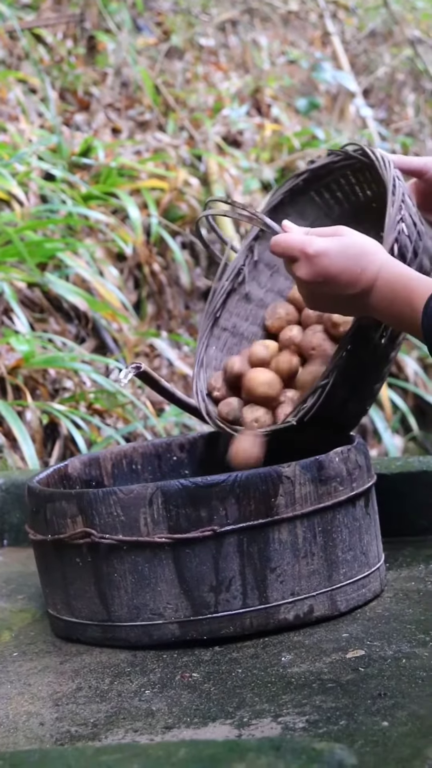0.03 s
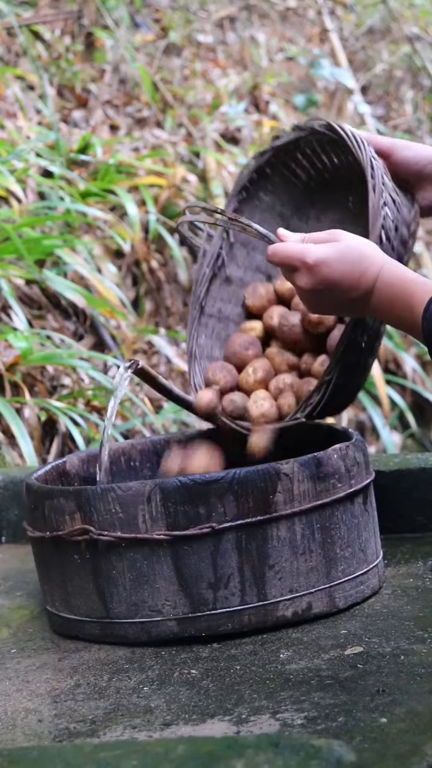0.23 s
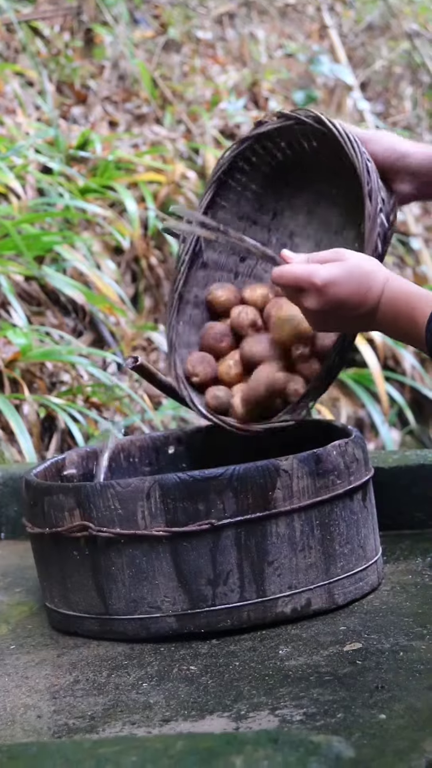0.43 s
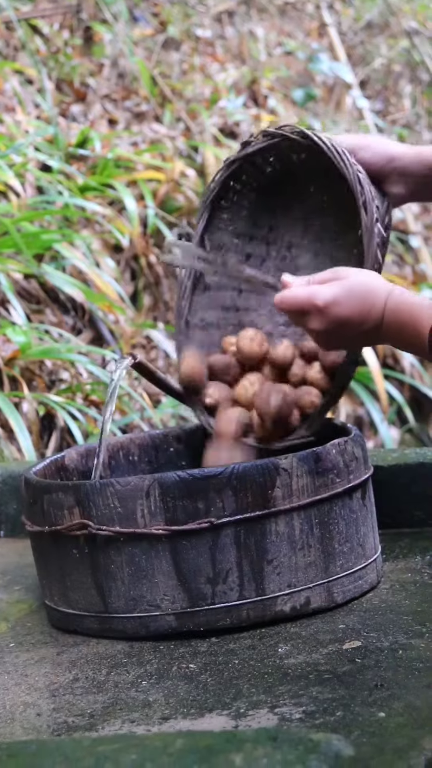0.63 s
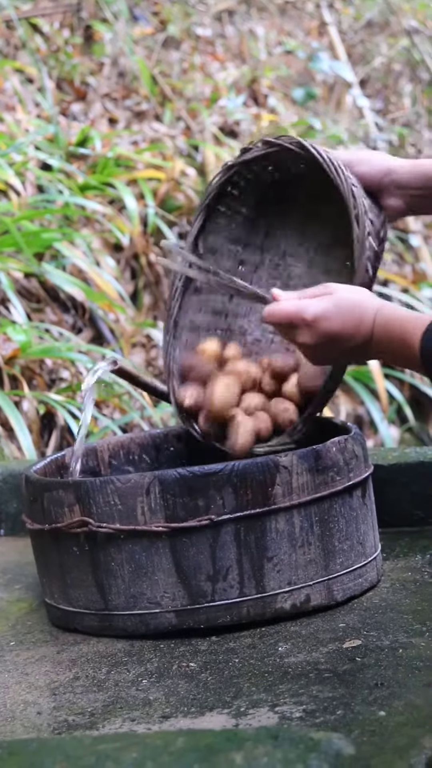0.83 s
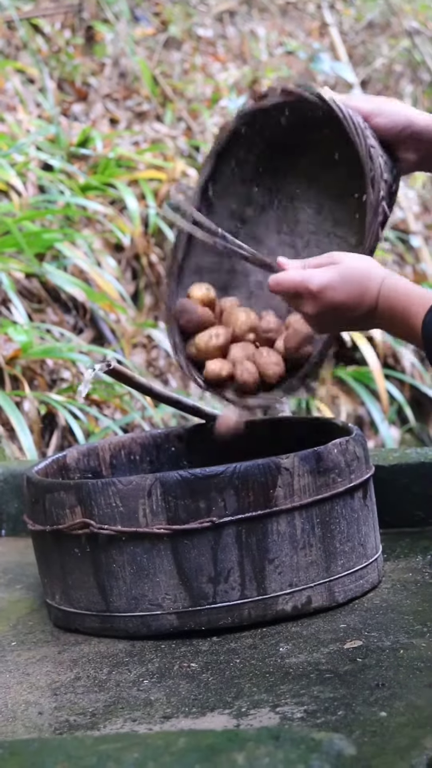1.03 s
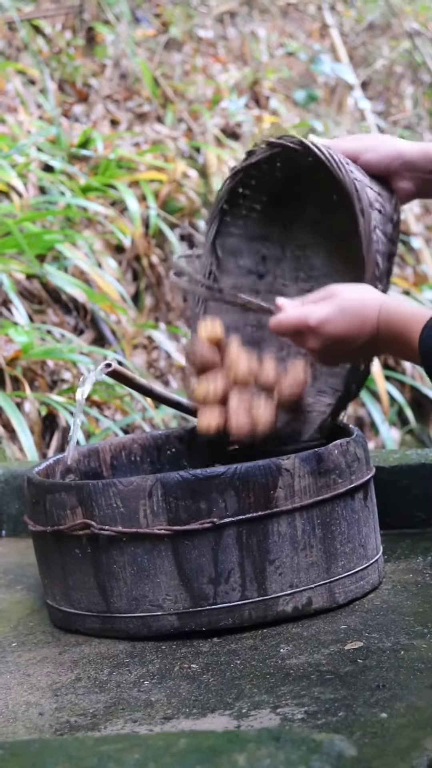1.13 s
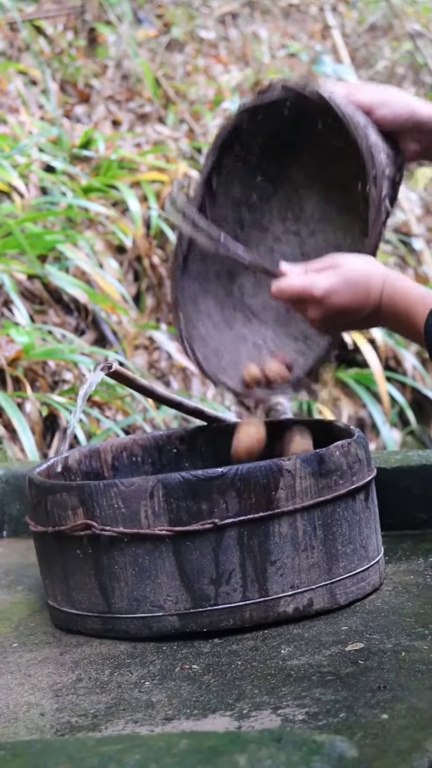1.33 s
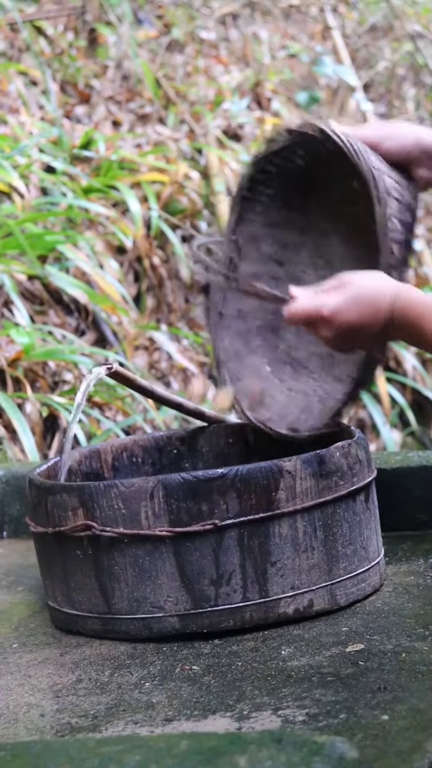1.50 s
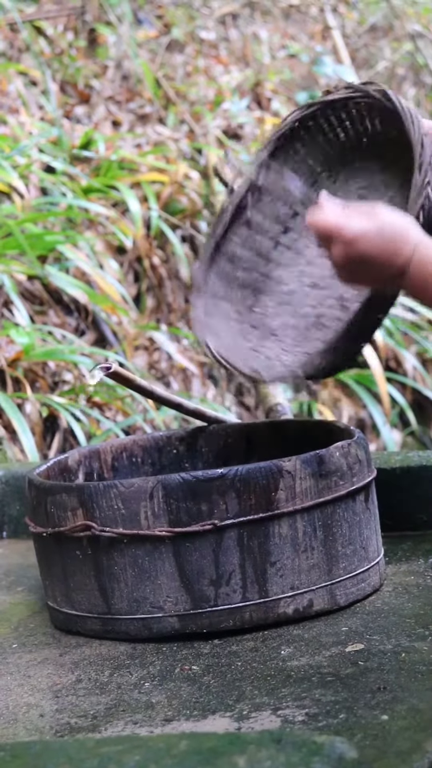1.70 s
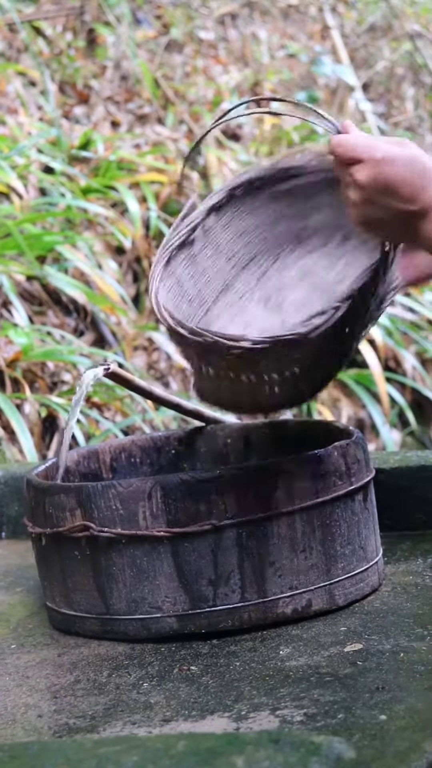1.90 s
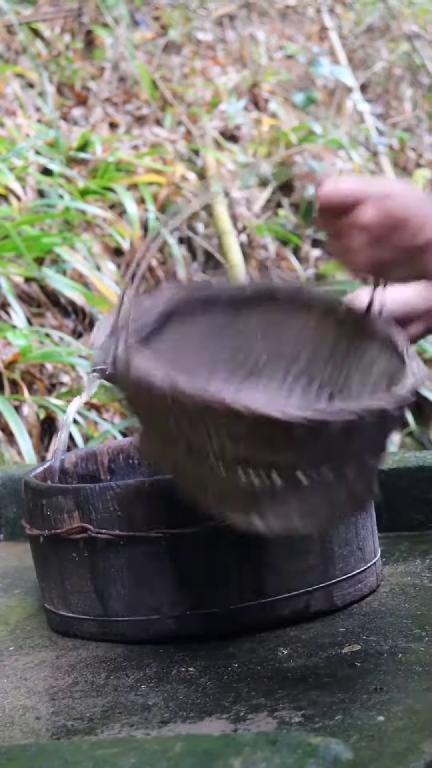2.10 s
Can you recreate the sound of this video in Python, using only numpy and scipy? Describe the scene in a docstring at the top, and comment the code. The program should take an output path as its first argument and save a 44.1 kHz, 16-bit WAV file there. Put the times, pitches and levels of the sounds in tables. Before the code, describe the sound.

Small potatoes tumble into a wet wooden tub with hollow thuds and little splashes.

```python
"""Outdoors, at a wet wooden tub: small potatoes are tipped in from a wicker basket.
Each thuds on the boards, rings the tub's hollow and jostles the others; some slap into shallow
water and throw drops that ring as bubbles. The wicker crackles and snaps as the load rolls out.
A thin stream trickles into the tub, over faint air hiss and yard reflections."""
import sys
import numpy as np
from scipy import signal
from scipy.fft import rfft, irfft
from scipy.io import wavfile
from scipy.ndimage import uniform_filter1d

SR = 44100
rng = np.random.default_rng(int(sys.argv[2]) if len(sys.argv) > 2 else 0)


def master(y):
    """Save y as 16-bit WAV."""
    cut = np.clip(np.atleast_2d(y).T, -1, 1)
    pcm = np.round(cut * 32767)  # scale
    wavfile.write(sys.argv[1], SR, pcm.astype(np.int16))


N = 94815
TIME_S = np.arange(N) / SR

# Table levels are relative; each source adds its own gain.
# (time [s], hollow ring [dB], board knock [dB], base thump [dB], favoured ring [Hz], favoured knock [Hz])
LANDINGS = [(.189,-27.5,-36.5,-32,392,1210), (.201,-13.5,-26,-40,380,740), (.341,-10.5,-17.5,-52,460,804),
            (.353,-16.5,-28,-33,420,1190), (.383,-11.5,-18.5,-50,404,1160), (.390,-27,-23,-27,420,1150),
            (.413,-15,-27.5,-52,470,885), (.486,-23.5,-25.5,-30,360,1290), (.584,-25,-60,-44,384,1110),
            (.666,-7.5,-15,-36,400,1030), (.677,-12.5,-38,-30,400,1400), (.711,-9.5,-26.5,-30,400,1230),
            (.764,-12,-23,-30,397,1140), (.774,-13.5,-27.5,-29,377,1170), (.816,-13,-21.5,-22.5,360,1110),
            (.858,-12.5,-20.5,-39,390,1160), (.877,-15.5,-21.5,-24,304,1330),
            (0.955,-55,-35.5,-32.5,315,1136), (.992,-15.5,-25.5,-54,444,1140), (1.032,-18,-25,-47,400,966),
            (1.057,-17.5,-47,-62,394,1400), (1.078,-21,-19.5,-66,405,1260), (1.096,-14.5,-32,-67,366,1120),
            (1.207,-18,-17.5,-24,386,770), (1.241,-26,-30,-28,400,850), (1.283,-14,-24.5,-33,440,810),
            (1.319,-10.5,-13.5,-53,480,1260), (1.350,-16.5,-25.5,-56,427,1270),
            (1.402,-14,-22.5,-26.5,347,1020), (1.468,-20,-27,-39,460,1200), (1.506,-21,-28.5,-48,470,1360),
            (1.529,-22,-48,-36,466,1200), (1.581,-24,-26,-26,307,1090), (1.684,-20,-30,-32.5,312,730),
            (1.812,-35.5,-47,-52,450,910)]
HOLLOW_MODES = [(192.1, -13, 0.26), (247.6, -16, 0.22), (315.4, -2, 0.085), (359.7, -0.5, 0.075),
                (395.1, 0, 0.1), (458.5, -4, 0.14), (488.5, -7, 0.14), (563.5, -13, 0.15)]  # tub cavity (frequency [Hz], level [dB], T60 [s])
BOARD_MODES = [(715, 3.5), (815, 4), (930, -4), (1155, -0.5), (1260, -2.5), (1425, -0.5), (1710, -7.5),
               (1845, -9.5), (2150, -3), (2390, -6)]  # tub boards (frequency [Hz], level [dB])
BASE_MODES = [(70, -3, .13), (92, -2, .11), (122, -1, .1), (155, -2, .09)]  # tub base (frequency [Hz], level [dB], T60 [s])
SCUFF_SPECTRUM = [(200, -15.5), (400, -24), (620, -35), (800, -7), (1400, -2.5), (1900, -16), (4500, -19.5),
                  (16000, -44.5)]  # potato skin on wood (frequency [Hz], level [dB])
COLLISIONS = [(.079,1494,-37), (.113,1460,-33.5), (.344,2156,-21.5), (0.391,1175,-15.5), (.412,1337,-18.5),
              (.711,1335,-26), (.733,2390,-29), (.784,1162,-18.5), (0.8,1220,-27), (.858,757,-21),
              (0.933,2310,-31), (0.96,1710,-32), (1.032,926,-17.5), (1.072,2190,-23), (1.092,1200,-18),
              (1.241,797,-19.5), (1.301,774,-21), (1.363,1203,-25), (1.424,1370,-29.5)]  # potato on potato (time [s], pitch [Hz], level [dB])

WET_HITS = [(0.2009,-19.5,-27.5,-18), (.342,-65,-44,-29), (0.366,-30.5,-34,-40), (0.4583,-16,-10,-26),
            (0.611,-41,-35,-43), (0.669,-34,-20,-46), (.731,-35.5,-24.5,-21), (.757,-28.5,-42,-33),
            (0.859,-25.5,-13.5,-37.5), (0.881,-45,-20,-40), (1.06,-37.5,-19.5,-38), (1.195,-34,-27,-31),
            (1.226,-30,-16.5,-22), (1.292,-34,-14.5,-46), (1.314,-26,-10,-37), (1.472,-37,-20.5,-39.5),
            (1.575,-38.5,-21,-40.5), (1.683,-37,-25,-39.5)]  # potato on water (time [s], smack [dB], splash [dB], sizzle [dB])
SMACK_SPECTRUM = [(1500, -0.5), (3500, 3), (4800, 6.5), (6700, 7.5), (8200, -1.5), (12000, -37)]  # sharp wet contact (frequency [Hz], level [dB])
SPLASH_SPECTRUM = [(600, -115), (1300, 23.5), (2000, 21), (3000, 25.5), (4500, 11.5), (7000, -44),
                   (16000, -115)]  # lower splash (frequency [Hz], level [dB])
SIZZLE_SPECTRUM = [(5000, -9), (8500, -1), (10500, 1), (13000, -4.5), (16000, -12.5)]  # fine top of a slap (frequency [Hz], level [dB])
DROP_BUBBLES = [(.128, 7200, -46, 0.023), (0.288, 3230, -33, 0.042), (0.461, 1276, -23, 0.09),
                (0.482, 2730, -18, 0.024), (0.528, 883, -29.5, 0.048), (.538, 3250, -25.5, 0.031),
                (0.743, 1730, -21.5, 0.022), (1.396, 2900, -27.5, 0.043), (1.664, 3190, -40, 0.042),
                (1.785, 4800, -39, .018), (1.852, 4120, -45, 0.02), (1.872, 2620, -46, 0.018),
                (1.922, 2850, -42.5, 0.025), (1.973, 2720, -39, 0.022), (1.991, 3200, -41.5, 0.013),
                (2.050, 5310, -39.5, 0.022), (2.061, 840, -31.5, 0.056), (2.080, 1428, -29.5, 0.054),
                (2.101, 2240, -39.5, 0.056), (2.106, 7200, -41.5, 0.032)]  # air trapped by drops (time [s], pitch [Hz], level [dB], T60 [s])

ROLL_ENVELOPE = [(0, -14), (.1, -11), (.17, -13.5), (.32, -19), (.40, -2), (.56, -10), (.65, -2.5),
                 (.76, 0.5), (.9, -1.5), (.97, -1.5), (1.09, 2.5), (1.18, -8), (1.24, -4), (1.33, 5),
                 (1.45, -4), (1.58, -8), (1.75, -8), (1.88, -27), (2.15, -30.5)]  # how hard the load rolls (time [s], level [dB])
GURGLE_SPECTRUM = [(600, -11), (1200, -4), (2000, -1.5), (3000, -3), (4000, -6.5)]  # bubbles in stirred water (frequency [Hz], level [dB])
WICKER_SPECTRUM = [(500, 17), (1200, 4), (2800, -6.5), (4500, -4), (7000, -1), (9000, -8), (12000, -9.5),
                   (16000, -25)]  # basket crackle (frequency [Hz], level [dB])
CANE_SNAPS = [(0.0906, -39.5, 3670), (1.3418, -29.5, 8000), (1.343, -28, 7840)]  # sharp snaps (time [s], level [dB], favoured pitch [Hz])
CANE_MODES = [(3600, -0.5), (5670, -1), (6980, 2.5), (9800, -3), (11000, 0.5), (12600, -9)]  # one cane (frequency [Hz], level [dB])
SHUFFLE_ENVELOPE = [(0, -45), (.06, -41.5), (.11, -52), (.18, -54), (.3, -75), (2.15, -88)]  # load shifting in the basket (time [s], level [dB])
SHUFFLE_SPECTRUM = [(170, 7.5), (700, -4), (1500, 2), (6000, -5), (16000, -24.5)]  # its soft taps (frequency [Hz], level [dB])

TRICKLE_SPECTRUM = [(900, -10), (1500, -6), (2800, 11), (4500, 0), (7000, 10), (12000, -37)]  # bubbles under the stream (frequency [Hz], level [dB])
AIR_SPECTRUM = [(15, -49), (25, -1.5), (250, 3.5), (516, -3.5), (3080, -5), (4740, -9.5), (14000, -16),
                (16000, -28)]  # water hiss and outdoor air (frequency [Hz], level [dB])
YARD_SPECTRUM = [(50, -10), (300, -6.5), (700, 3.5), (3000, 8.5), (10000, 11), (16000, -1)]  # reflections (frequency [Hz], level [dB])
EAR_BALANCE = [(60, 1.7), (200, 0.3), (380, 0), (720, 4), (1300, -1.1), (2800, -3), (5500, 1.5),
               (9500, 10.5), (14000, 2.5)]  # tub's direction (frequency [Hz], left minus right [dB])

BOARD_T60_S = 0.071


def thuds():
    """Each landing rings the hollow, knocks the boards, thumps the base and scuffs the skin."""
    times_s, ring_db, knock_db, thump_db, ring_hz, knock_hz = np.transpose(LANDINGS)
    board_modes = [(hz, db, BOARD_T60_S) for hz, db in BOARD_MODES]
    hollow = strike(HOLLOW_MODES, times_s, ring_db - 9, ring_hz,
                    db_per_oct=10.5, rise_s=0.0028, uneven_db=5, detune=0.014)
    boards = strike(board_modes, times_s, knock_db - 7, knock_hz,
                    db_per_oct=9, rise_s=0.003, uneven_db=3.5, detune=0.045)
    base = strike(BASE_MODES, times_s, thump_db - 11, ring_hz,
                  db_per_oct=0, rise_s=0.0065, uneven_db=1, detune=0.097)
    scuff = noise(SCUFF_SPECTRUM) * bursts(times_s, knock_db, rise_s=0.0033, t60_s=0.049)
    return hollow + boards + base + scuff


def knocks(rise_s=0.0014, t60_s=0.047):
    """Potatoes collide: a pitched tock with a weaker, shorter overtone."""
    out, t = np.zeros(N), TIME_S[:SR // 8]
    for time_s, hz, db in COLLISIONS:
        tock = np.sin(2 * np.pi * hz * t) * swell(t, rise_s, t60_s)
        overtone = np.sin(2 * np.pi * hz * rng.uniform(1.5, 1.77) * t) * swell(t, rise_s, t60_s / 2)
        add(out, time_s, from_db(db) * (tock + from_db(-8.5) * overtone))
    return out


def slaps(rise_s=0.0026, t60_s=0.015):
    """Potatoes hit water: a sharp smack, a sizzling top and a lower, longer splash."""
    times_s, smack_db, splash_db, sizzle_db = np.transpose(WET_HITS)
    smack = noise(SMACK_SPECTRUM) * bursts(times_s, smack_db + 11, rise_s, t60_s)
    sizzle = noise(SIZZLE_SPECTRUM) * bursts(times_s, sizzle_db + 1, rise_s, t60_s)
    splash = noise(SPLASH_SPECTRUM) * bursts(times_s, splash_db - 4, rise_s=0.0042, t60_s=0.044)
    return smack + sizzle + splash


def drops():
    """Each drop traps a bubble that wobbles and rises in pitch, in a splash centred on that pitch."""
    out, t = np.zeros(N), TIME_S[:SR // 8]
    for time_s, hz, db, t60_s in DROP_BUBBLES:
        wobble = 1 + 0.35 * unit_rms(uniform_filter1d(rng.standard_normal(len(t)), size=120))
        phase_rad = 2 * np.pi * hz * t * (1 + 0.065 * t / t60_s) + wobble
        bubble = wobble * swell(t, rise_s=0.0006, t60_s=t60_s) * np.sin(phase_rad)
        band = signal.butter(1, [hz / 1.2, hz * 1.2], "band", fs=SR, output="sos")
        hiss = unit_rms(signal.sosfilt(band, rng.standard_normal(len(t))))
        splash = from_db(-5.5) * hiss * swell(t, rise_s=0.0029, t60_s=0.053)
        add(out, time_s, from_db(db) * (bubble + splash))
    return out


def rolling():
    """Potatoes bump along the tub and stir the water; the wicker crackles under the load."""
    bumps = clicks(per_s=130, spread_db=3)
    crackle = coloured(clicks(per_s=460, spread_db=5) + 0.23 * rng.standard_normal(N), WICKER_SPECTRUM)
    gurgle = bubbles(GURGLE_SPECTRUM, per_s=260, cycles=24)
    hollow = sum(ring(bumps * rng.normal(0, from_db(db), N), hz, t60_s) for hz, db, t60_s in HOLLOW_MODES)
    boards = sum(ring(bumps * rng.normal(0, from_db(db), N), hz, BOARD_T60_S) for hz, db in BOARD_MODES)
    jostle = from_db(-35.5) * unit_rms(hollow) + from_db(-45) * unit_rms(boards)
    return envelope(ROLL_ENVELOPE) * (jostle + from_db(-42.5) * crackle + from_db(-41) * gurgle)


def cane_snaps(rise_s=0.0001):
    """Canes snap: a noisy edge and a few milliseconds of bright ringing."""
    times_s, db, favoured_hz = np.transpose(CANE_SNAPS)
    modes = [(hz, mode_db, 0.0092) for hz, mode_db in CANE_MODES]
    canes = strike(modes, times_s, db, favoured_hz, db_per_oct=8, rise_s=rise_s, uneven_db=1, detune=0.015)
    edge = noise(WICKER_SPECTRUM) * bursts(times_s, db + 9, rise_s, t60_s=0.0058)
    return canes + edge


def spray():
    """Droplets spatter all over the tub after each slap; stereo."""
    times_s, smack_db, _, sizzle_db = np.transpose(WET_HITS)
    out = np.zeros((2, N))
    for spectrum, db in ((SMACK_SPECTRUM, smack_db), (SIZZLE_SPECTRUM, sizzle_db)):
        middle, left, right = [coloured(clicks(per_s=1100, spread_db=1), spectrum) for _ in range(3)]
        gain = bursts(times_s, np.minimum(db, -35) - 8.5, rise_s=0.0011, t60_s=0.15)
        out += gain * (place_left(middle) + np.array([left, right]))
    return out


def shuffle():
    """Potatoes tap each other and the wicker before the first one falls."""
    return envelope(SHUFFLE_ENVELOPE) * coloured(clicks(per_s=600, spread_db=3), SHUFFLE_SPECTRUM)


def trickle():
    """A thin stream breaks up unevenly into tiny bubbles."""
    spurts_db = 2 * unit_rms(uniform_filter1d(rng.standard_normal(N), size=900))
    return from_db(-55.5 + spurts_db) * bubbles(TRICKLE_SPECTRUM, per_s=480, cycles=30)


def air():
    """Steady water hiss and outdoor air, part from the tub, part diffuse; stereo."""
    near = place_left(noise(AIR_SPECTRUM))
    diffuse = coloured(rng.standard_normal((2, N)), AIR_SPECTRUM)
    return from_db(-55) * (near + 1.1 * diffuse)


def yard(x):
    """Faint scattered reflections, one tail per ear."""
    tails = [noise(YARD_SPECTRUM) * swell(TIME_S, rise_s=0.0032, t60_s=0.34) for _ in range(2)]
    echoes = [signal.fftconvolve(x, tail / np.linalg.norm(tail))[:N] for tail in tails]
    return from_db(-9.5) * np.array(echoes)


def place_left(x, lead_s=56e-6):
    """Tub slightly left: earlier and brighter in that ear."""
    hz = np.fft.rfftfreq(2 * N, 1 / SR)
    left = from_db(db_at(EAR_BALANCE, hz) / 2) * np.exp(1j * np.pi * hz * lead_s)
    return irfft(rfft(x, 2 * N) * np.array([left, 1 / left]))[:, :N]


def strike(modes, times_s, levels_db, favoured_hz, db_per_oct, rise_s, uneven_db, detune):
    """Blows on a set of modes; each spot favours those near one pitch and detunes them slightly."""
    hz, mode_db, t60_s = np.transpose(modes)[:, :, None]
    out, t = np.zeros(N), TIME_S[:SR // 3]
    decay = swell(t, rise_s, t60_s)
    for time_s, db, centre_hz in zip(times_s, levels_db, favoured_hz):
        strength, shift = rng.standard_normal((2, len(hz), 1))
        gains = from_db(mode_db + uneven_db * strength - db_per_oct * np.abs(np.log2(hz / centre_hz)))
        blow = np.sum(gains * decay * np.sin(2 * np.pi * hz * (1 + detune * shift) * t), axis=0)
        add(out, time_s, from_db(db) * blow / np.std(blow[:SR // 50]))  # level set over first 20 ms
    return out


def bubbles(spectrum, per_s, cycles, sizes=32):
    """Bubbles of many sizes, each falling 60 dB in `cycles` periods; rms 1."""
    pitches_hz = np.geomspace(spectrum[0][0], spectrum[-1][0], sizes) * rng.uniform(1, 1.04, sizes)
    out = np.zeros(N)
    for hz in pitches_hz:
        out += from_db(db_at(spectrum, hz)) * ring(clicks(per_s / sizes, spread_db=2.5), hz, cycles / hz)
    return unit_rms(out)


def ring(drive, hz, t60_s):
    """One mode as a two-pole resonator."""
    radius, step_rad = from_db(-60 / (t60_s * SR)), 2 * np.pi * hz / SR
    poles = [1, -2 * radius * np.cos(step_rad), radius * radius]
    return signal.lfilter([0, np.sin(step_rad)], poles, drive + 1e-18)


def clicks(per_s, spread_db):
    """Random impulses of uneven size and sign."""
    hits = rng.random(N) < per_s / SR
    gains = from_db(spread_db * np.minimum(rng.exponential(1, N), 3))
    return hits * gains * rng.choice([-1, 1], N)


def bursts(times_s, levels_db, rise_s, t60_s):
    """One swell per event."""
    out = np.zeros(N)
    for time_s, db in zip(times_s, levels_db):
        add(out, time_s, from_db(db) * swell(TIME_S[:SR // 3], rise_s, t60_s))
    return out


def swell(t, rise_s, t60_s):
    """Quick rise, exponential decay."""
    return (1 - np.exp(-(t / rise_s) ** 2)) * from_db(-60 * t / t60_s)


def envelope(points):
    """Gain per sample from (time [s], level [dB])."""
    return from_db(np.interp(TIME_S, *np.transpose(points)))


def noise(spectrum):
    """Coloured Gaussian noise; rms 1."""
    return coloured(rng.standard_normal(N), spectrum)


def coloured(x, spectrum):
    """Filter by a spectrum table; rms 1."""
    hz = np.fft.rfftfreq(N, 1 / SR)
    return unit_rms(irfft(rfft(x) * from_db(db_at(spectrum, hz)), N))


def db_at(spectrum, hz):
    """Interpolate on a log-frequency axis."""
    points_hz, db = np.transpose(spectrum)
    return np.interp(np.log(np.maximum(hz, 1)), np.log(points_hz), db)


def add(out, time_s, sound):
    start = int(time_s * SR)
    out[start:start + len(sound)] += sound[:max(N - start, 0)]


def unit_rms(x):
    return x / np.sqrt(np.mean(x ** 2) + 1e-20)


def from_db(db):
    return 10 ** (np.asarray(db) / 20)


def scene():
    """Tub, basket and water in open air; the snaps stay almost dry."""
    tub = thuds() + knocks() + slaps() + drops() + rolling() + shuffle() + trickle()
    snaps = cane_snaps()
    return place_left(tub + snaps) + air() + spray() + yard(tub + from_db(-11) * snaps)


def record(dry, low_cut_hz=82.5, high_cut_hz=15800):
    """Microphone: deep bass shed, top cut steeply."""
    highpass = signal.butter(3, low_cut_hz, "high", fs=SR, output="sos")
    lowpass = signal.ellip(8, 0.1, 60, high_cut_hz, fs=SR, output="sos")
    return signal.sosfiltfilt(lowpass, signal.sosfilt(highpass, dry))


dry = scene()
out = record(dry)
master(out)
```